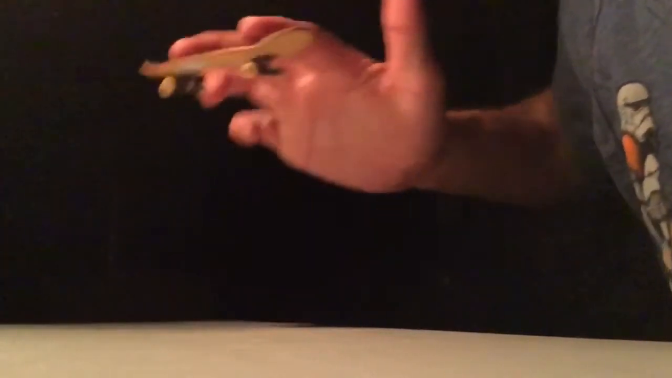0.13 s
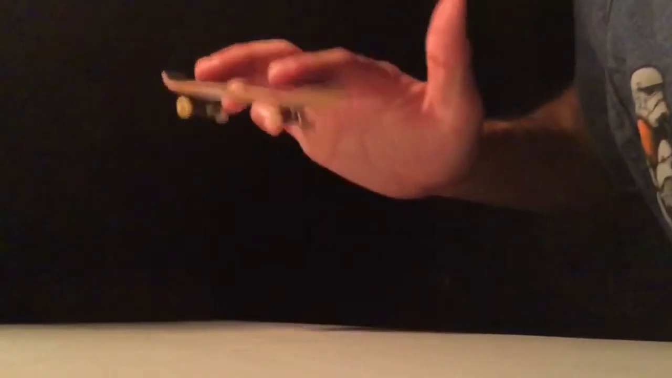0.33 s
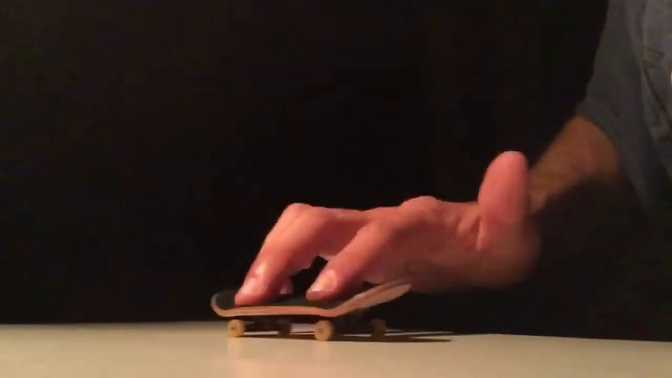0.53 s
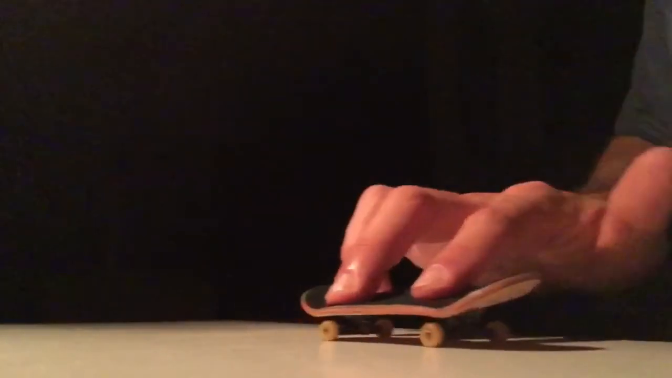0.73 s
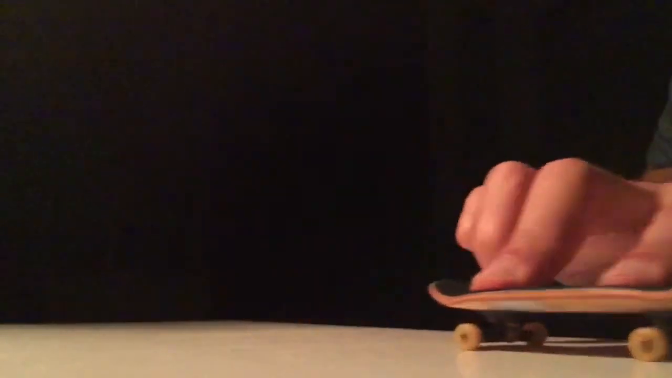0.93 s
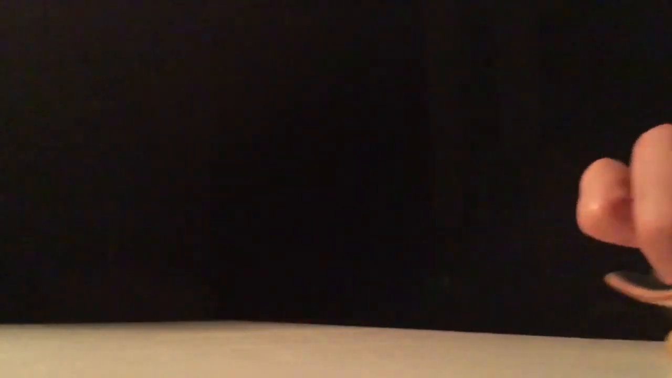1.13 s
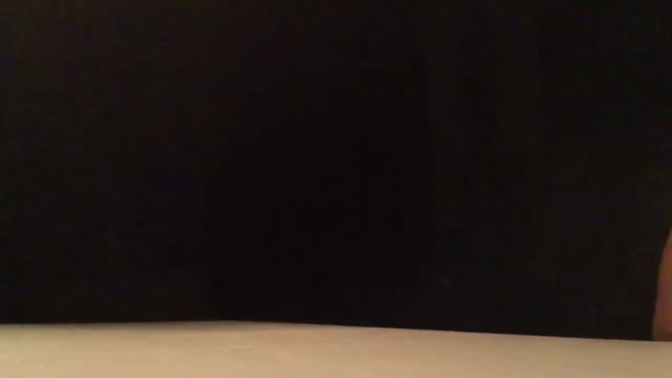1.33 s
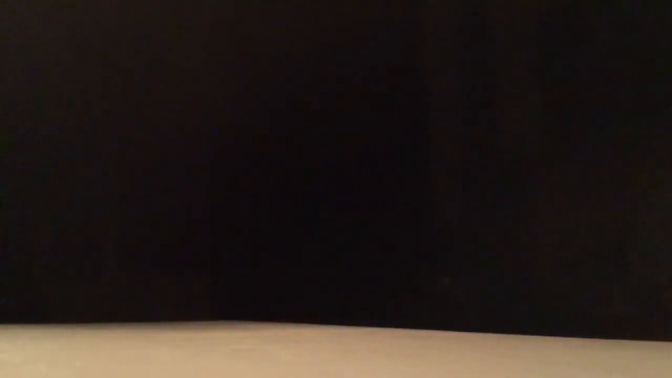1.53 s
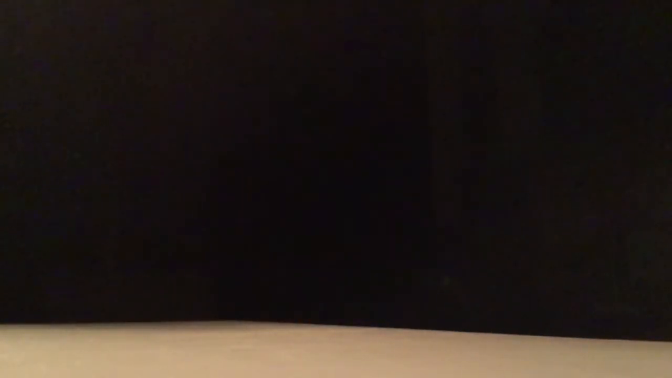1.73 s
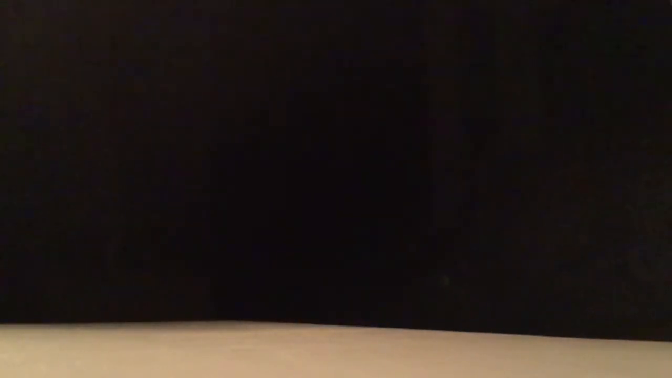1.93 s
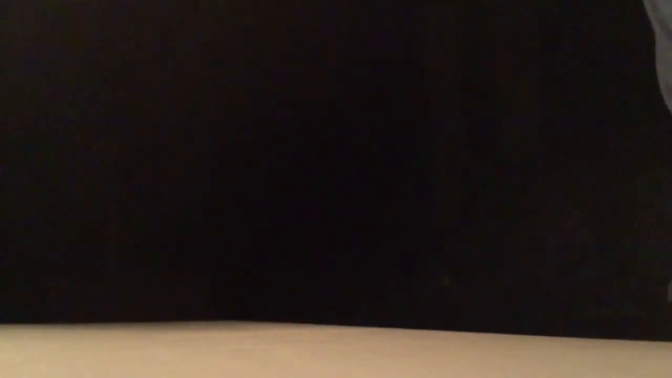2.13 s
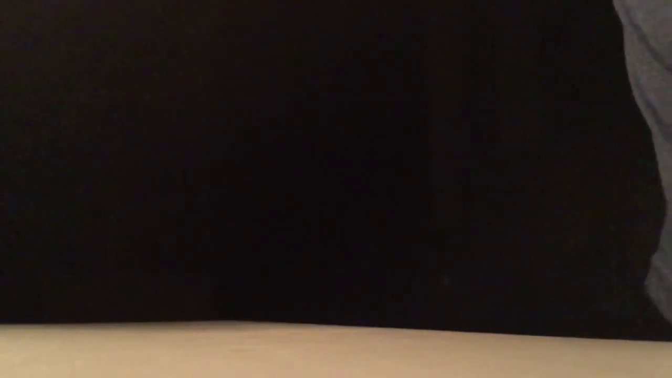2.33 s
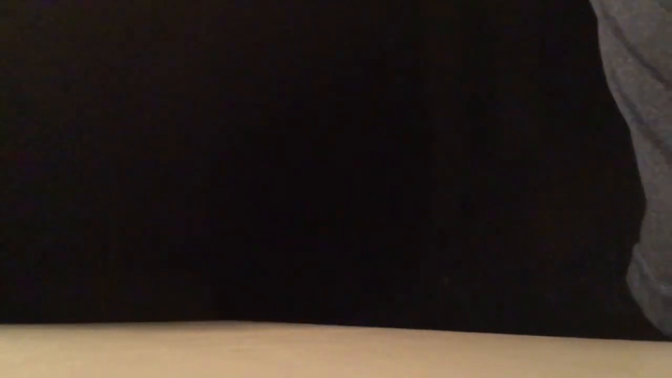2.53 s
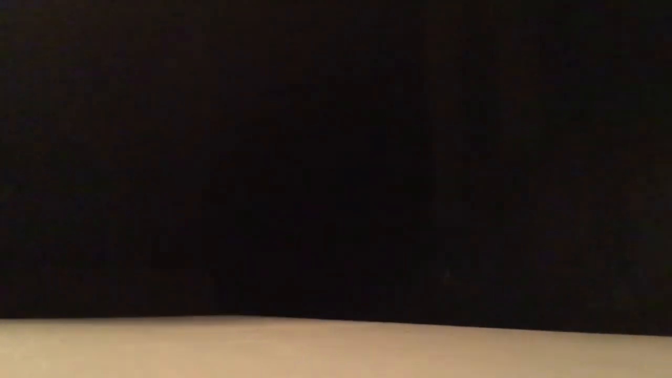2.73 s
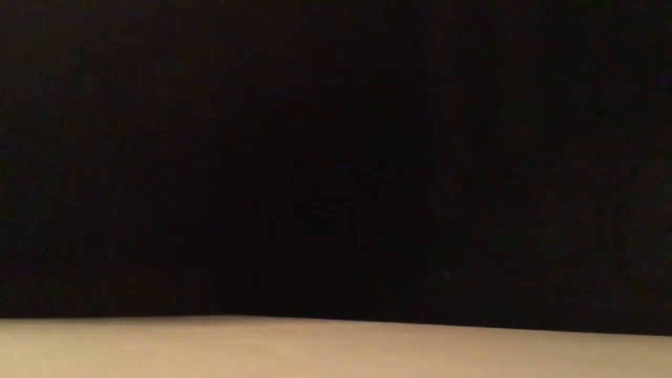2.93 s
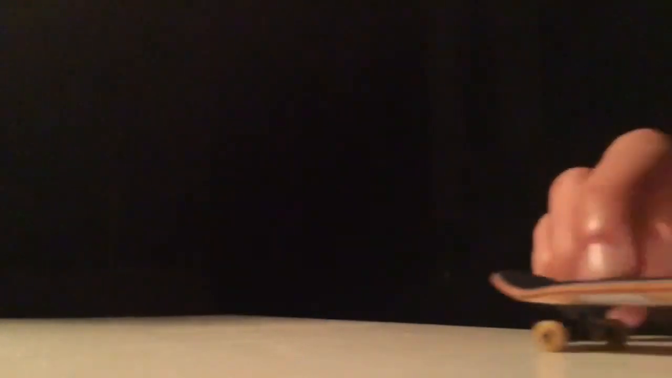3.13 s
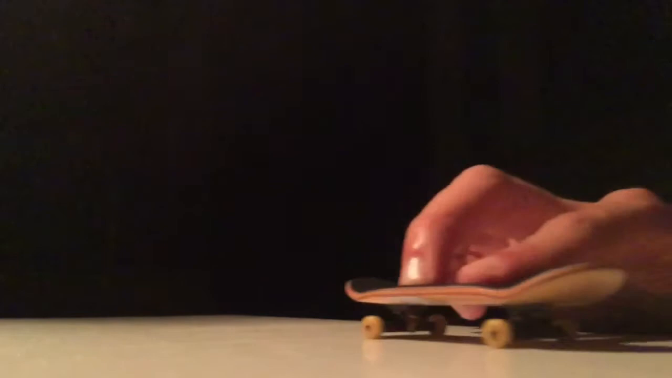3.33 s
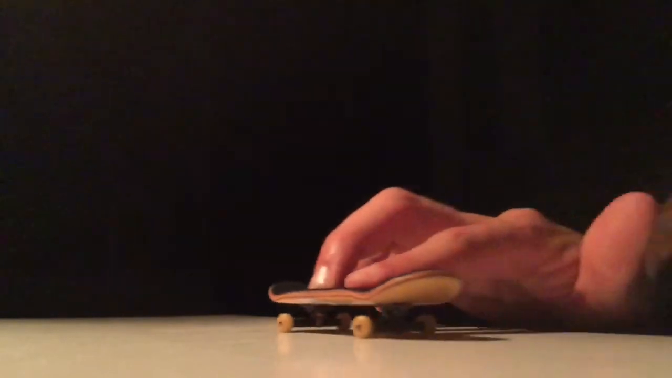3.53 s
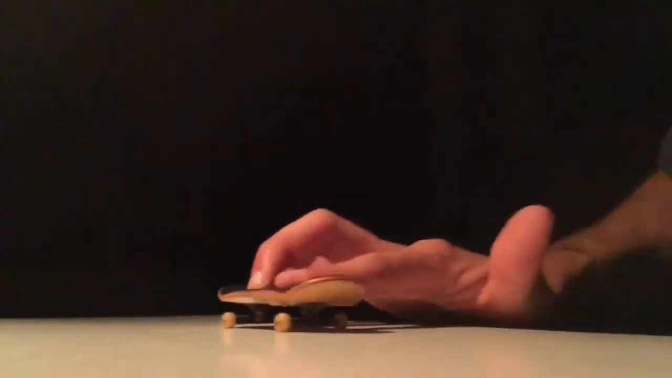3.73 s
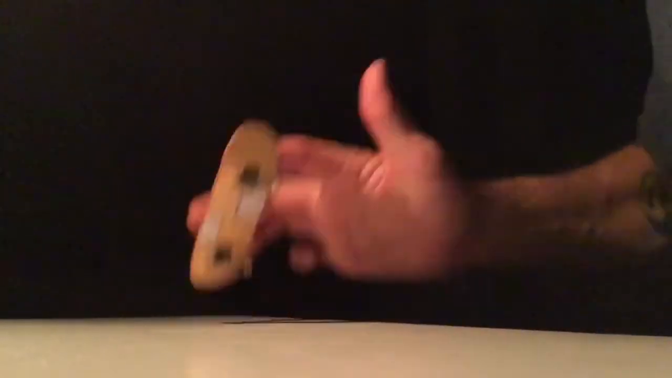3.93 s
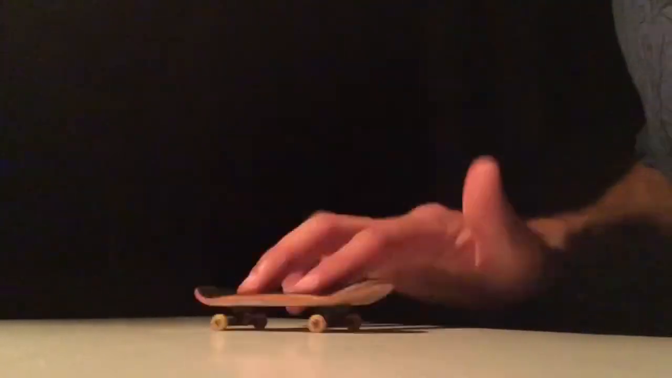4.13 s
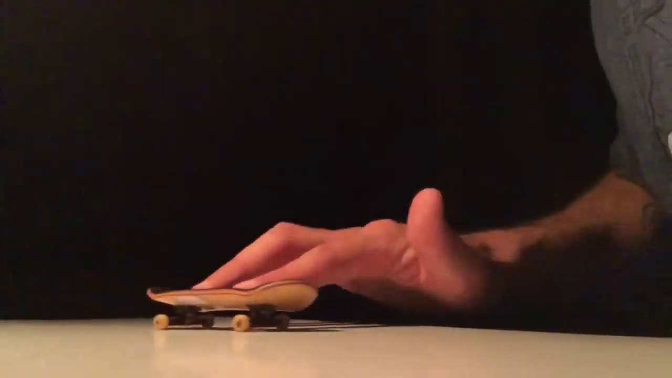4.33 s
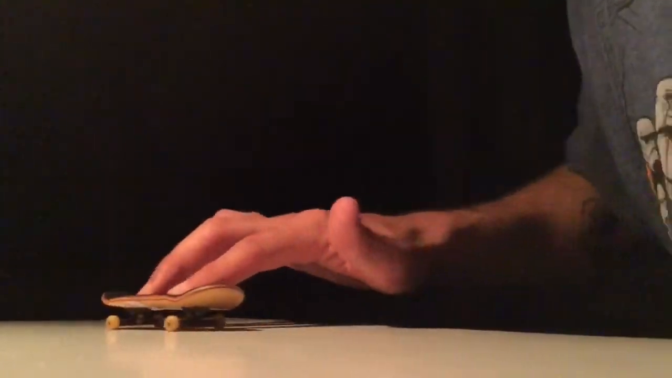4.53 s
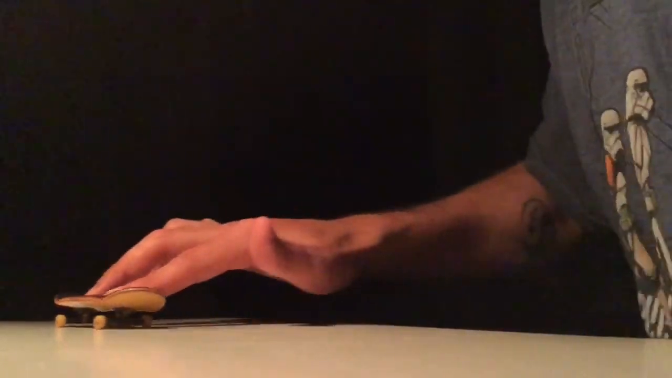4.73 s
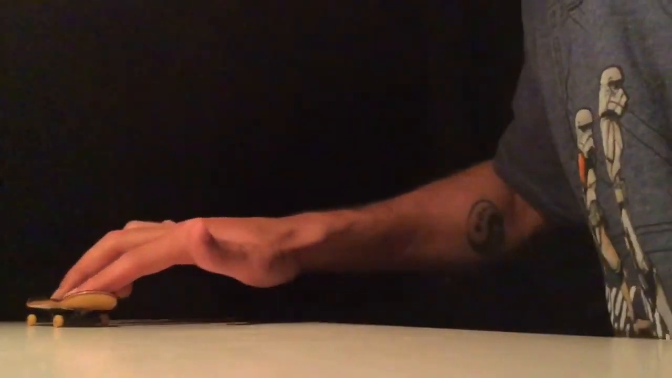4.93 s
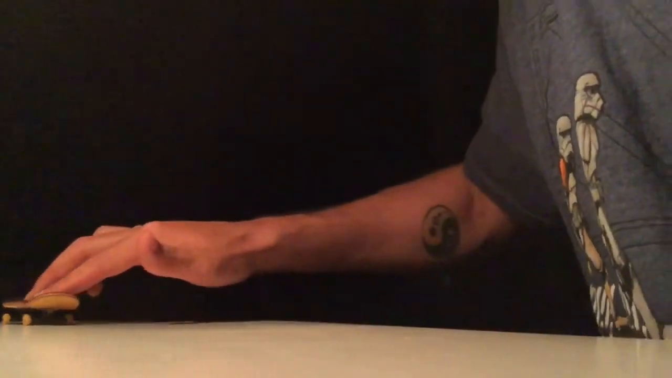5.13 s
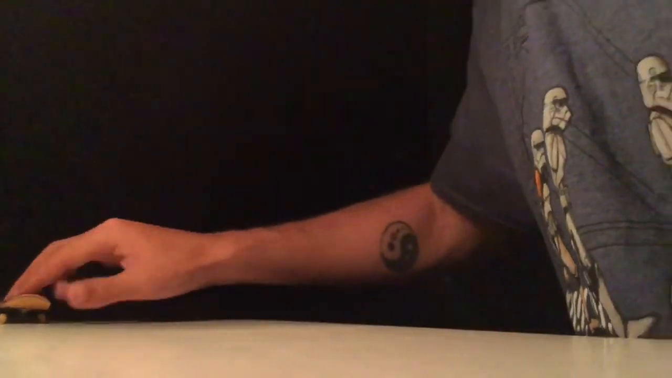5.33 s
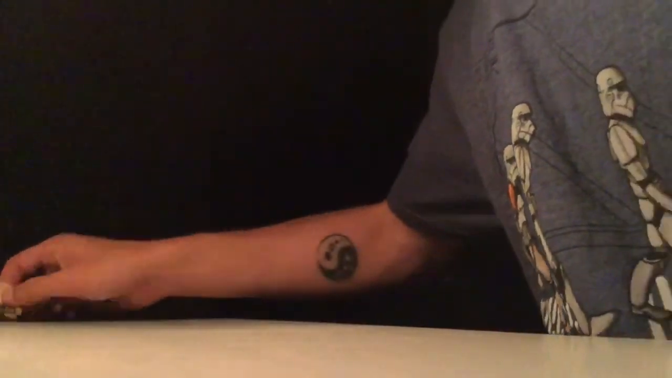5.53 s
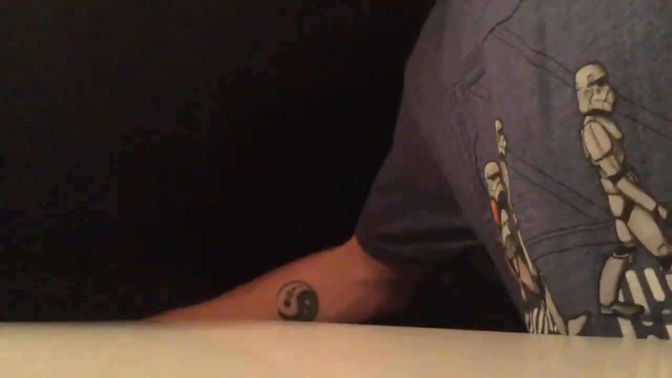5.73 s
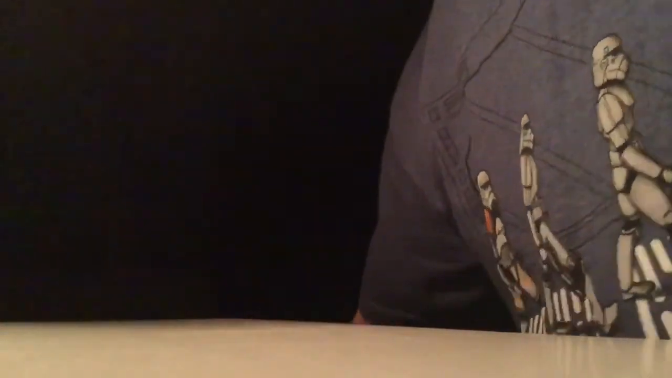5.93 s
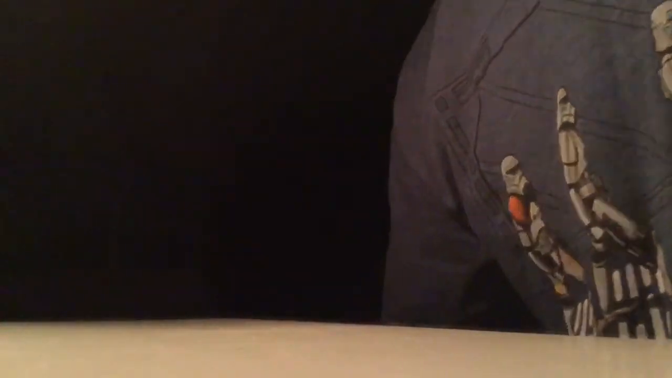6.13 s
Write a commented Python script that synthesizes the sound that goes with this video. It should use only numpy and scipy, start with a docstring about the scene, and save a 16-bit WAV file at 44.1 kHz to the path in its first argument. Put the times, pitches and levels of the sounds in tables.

```python
"""Fingerboard on a tabletop

A fingerboard is pushed to and fro in a small room, close to the microphone. Its hard wheels drum
on the grain of the top, which booms and rings. Fingers scuff the grip tape and the board scrapes
along an edge. After two hard shoves the tail pops, the wheels slam down in sharp clacks, and the
board rolls off to clatter at the far end of the table."""
import sys
import numpy as np
from scipy import signal
from scipy.fft import rfft, irfft, next_fast_len
from scipy.io import wavfile
from scipy.ndimage import uniform_filter1d, map_coordinates

SR = 44100
rng = np.random.default_rng(int(sys.argv[2]) if len(sys.argv) > 2 else 0)


def generate_wav(signal):
    """Clip the signal to [-1, 1] and save it as 16-bit WAV at the path in sys.argv[1]."""
    frames = np.transpose(np.atleast_2d(signal))
    scaled = np.clip(frames, -1, 1) * 32767
    pcm = np.round(scaled).astype(np.int16)
    wavfile.write(sys.argv[1], SR, pcm)


N = 277389


def amp(db):
    """Gain of a level in dB."""
    return np.exp(np.asarray(db) * (np.log(10) / 20))


def unit(x):
    """x at rms 1."""
    return x / np.sqrt(np.mean(x ** 2) + 1e-20)


def clock():
    """The time of every sample in seconds."""
    return np.arange(N) / SR


def along(points, hz):
    """Read a curve of (Hz, value) points on a log frequency axis."""
    freqs, values = np.transpose(points)
    return np.interp(np.log(hz + 1), np.log(freqs + 1), values)


def curves(rows):
    """Automation: one value per sample for each column after the time."""
    times, *columns = np.transpose(rows)
    return [np.interp(clock(), times, column) for column in columns]


def during(start, stop, fade):
    """A gate from start to stop, with equal-power fades at both ends."""
    return np.sqrt(np.clip(.5 + np.minimum(clock() - start, stop - clock()) / fade, 0, 1))


def wobble(rate, t):
    """A smooth random curve at the times t, with rate knots a second."""
    knots = rng.standard_normal(int(t[-1] * rate) + 4)
    fine = np.arange(0, len(knots) - 1, .125)
    return np.interp(t * rate, fine, map_coordinates(knots, [fine]))


def bell(x, centre, width):
    """A resonance-shaped bump: 1 at the centre, a half at half a width to either side."""
    return 1 / (1 + (2 * (x - centre) / width) ** 2)


def filtered(x, response):
    """x through a gain that depends on frequency."""
    size = next_fast_len(len(x) + 8192)
    return irfft(rfft(x, size) * response(np.fft.rfftfreq(size, 1 / SR)), size)[..., :len(x)]


def coloured(x, spectrum, peaks=()):
    """x at rms 1 after an EQ curve (Hz, dB) and resonant peaks (Hz, width in Hz, lift in dB)."""
    lift_db = lambda f: sum(db * bell(f, hz, width) for hz, width, db in peaks)
    return unit(filtered(x, lambda f: amp(along(spectrum, f) + lift_db(f))))


def noise(spectrum, peaks=(), size=N):
    """Coloured noise at rms 1."""
    return coloured(rng.standard_normal(size), spectrum, peaks)


def add(track, start, sound):
    """Mix a sound into the track at start seconds."""
    part = track[round(start * SR):][:len(sound)]
    part += sound[:len(part)]


# Colours of the ambience; the hiss also feeds the wheel whirr. Each row: frequency in Hz, level in dB.
RUMBLE_EQ = [(15, -41), (25, -25), (75, -4.5), (94, -3), (124, -11), (900, -29), (1170, -65), (1980, -120)]
HISS_EQ = [(410, -47), (700, -13), (752, -11), (1680, -14), (2740, -15), (6260, -28.5), (8000, -44),
           (10400, -74), (17600, -120)]
ROOM_TONE_EQ = [(24, -51), (40, -34.5), (120, 0.5), (228, 1), (343, 3), (435, -8), (685, -5.5), (1000, -11),
                (1160, -19), (1340, -15), (1700, -27), (1930, -27.5), (2250, -40.5), (3200, -39.5),
                (12000, -40), (15600, -81), (22000, -120)]

def background(wash_t60=0.42, tone_db=-64):
    """A wash of rumble and hiss dies to a faint rumble; dull room tone enters with the first run."""
    t = clock()
    wash = amp(-60 * t / wash_t60)
    rumble = (amp(-75) + amp(-59) * wash) * noise(RUMBLE_EQ)
    hiss = amp(-56.5) * wash * noise(HISS_EQ)
    tone_level = amp(tone_db + 1.1 * wobble(20, t))
    tone = tone_level * noise(ROOM_TONE_EQ, peaks=[(138, 28, 11), (236, 46, 12), (1430, 1200, 20)])
    first_run = STUTTER_BURSTS[0][0]
    return (rumble + hiss) * during(0, 0.554, 0.0069) + tone * during(first_run, N / SR, 0.0029)


# Random swirl in the tone, deepest in the treble. Each row: frequency in Hz, depth in dB.
SWIRL_DEPTH = [(800, .5), (2000, 2.4), (5000, 2.8), (8000, 4.5)]

def resonate(drive, spectrum, peaks=(), sliding=(), glide=((0, 1),), drift=0.011, swell=0.13):
    """Resonances swell and drift as the wheels cross their nodes; glide bends the sliding ones."""
    f, t, frames = signal.stft(drive, SR, nperseg=2048)
    gain_db = along(spectrum, f)[:, None]
    for group, bend in ((peaks, 1), (sliding, np.interp(t, *np.transpose(glide)))):
        for hz, width, db in group:
            centre = hz * bend * (1 + drift * max(1, hz / 900) * wobble(5, t))  # highs drift most
            lift_db = db * (1 + swell * wobble(7, t))
            gain_db = gain_db + lift_db * bell(f[:, None], centre, width)
    patches = uniform_filter1d(rng.standard_normal(frames.shape), size=12, axis=0)
    patches = unit(uniform_filter1d(patches, size=4, axis=1))
    gain_db = gain_db + along(SWIRL_DEPTH, f)[:, None] * patches
    return signal.istft(frames * amp(gain_db), SR, nperseg=2048)[1][:N]


def free_wheels(level_db=-76.5, stop=0.308):
    """In the air the wheels whirr on their axles, sinking in pitch until a finger stops them."""
    whirr = resonate(rng.standard_normal(N), HISS_EQ, sliding=[(2700, 630, 15)],
                     glide=[(0, 1.08), (stop, 0.95)], drift=0.003, swell=0.17)
    return unit(whirr) * amp(level_db) * during(0, stop, 0.052)


# Colours of the stutter, and of its bright tail and the clacks' crack.
# Each row: frequency in Hz, level in dB.
STUTTER_EQ = [(18, -44), (30, -19), (284, 7.5), (561, -5), (622, -17), (1020, -5), (1470, -8),
              (2830, -10.5), (15500, -26)]
CRACK_EQ = [(150, -20.5), (400, -4.5), (1200, -4.5), (3200, -1.5), (6000, -3), (8500, -6.5), (10500, -8.5),
            (13500, -7.5), (16000, -19)]
# The chops of the stutter. Each row: start in seconds, stop in seconds, level in dB.
STUTTER_BURSTS = [(0.5927, 0.5967, -33), (0.604, 0.61, -33), (0.6154, 0.626, -37.5), (0.6276, 0.64, -39)]

def stutter(tail_db=-46, tail_t60=0.15):
    """The first run starts with a rough, chopped burst of noise and a short tail."""
    chops = sum(amp(db) * during(start, stop, 0.0013) for start, stop, db in STUTTER_BURSTS)
    after = clock() - STUTTER_BURSTS[-1][1]
    tail = (after > 0) * amp(tail_db - 60 * np.abs(after) / tail_t60)
    return chops * noise(STUTTER_EQ) + tail * noise(CRACK_EQ)


def grit(per_s, spread_db=3, flutter_db=1.32, clumps_per_s=100):
    """Tiny blows from the grain of a surface, random in size and swelling in clumps."""
    hits = np.flatnonzero(rng.random(N) < per_s / SR)
    size_db = spread_db * rng.standard_normal(N)[hits]
    step = SR // 1000
    clump_db = flutter_db * wobble(clumps_per_s, clock()[::step])[hits // step]
    blows = np.zeros(N)
    blows[hits] = rng.choice([-1, 1], N)[hits] * amp(size_db + clump_db)
    return blows


def rolling(spectrum, peaks, sliding=(), glide=((0, 1),), grains_per_s=5000):
    """Grit and a few larger specks shake the table, in four bands: boom, body, rasp and fizz."""
    blows = grit(grains_per_s) + amp(4) * grit(per_s=18)
    top = resonate(blows, spectrum, peaks, sliding, glide)
    crossovers_hz = np.array([[450], [1800], [3400], [6500]])
    lowpassed = filtered(top, lambda f: 1 / (1 + (f / crossovers_hz) ** 12))
    boom, body, rasp, fizz, air = np.diff([np.zeros(N), *lowpassed, top], axis=0)
    fizz = fizz + air * amp(-5 + 5 * wobble(24, clock()))  # the highest hiss comes in patches
    return np.array([unit(band) * amp(0.44 * wobble(16, clock())) for band in (boom, body, rasp, fizz)])


def pushed(strokes, responses, bands, brake_curve):
    """The hand speeds up, holds and brakes; each band of the roll follows its effort and brightness."""
    t, out = clock(), np.zeros(N)
    for start, stop, speed_up, slow_down, db, rise_db, fall_db, bright_db, bright_db_per_s in strokes:
        rising = np.clip((t - start) / speed_up, 0, 1)
        braking = np.clip(1 - (stop - t) / slow_down, 0, 1)
        effort_db = -rise_db * np.cos(np.pi / 2 * rising) ** 2 - fall_db * braking ** brake_curve
        tilt_db = bright_db + bright_db_per_s * (np.clip(t, start, stop) - (start + stop) / 2)
        mix = sum(band * amp(band_db + by_effort * effort_db + by_tilt * tilt_db)
                  for band, (band_db, by_effort, by_tilt) in zip(bands, responses))
        out += amp(db) * during(start, stop, 0.025) * mix
    return out


# Colour of the roll near the microphone. Each row: frequency in Hz, level in dB.
NEAR_EQ = [(41, -89), (70, -126), (123, -12.5), (168, -21), (230, 6), (369, -5), (553, -13), (605, -19.5),
           (692, -2.5), (866, -12), (1270, -10), (1820, -16.5), (4170, -23.5), (7650, -42), (9500, -46.5),
           (15000, -53)]
# Resonances of the table going out and coming back, and the roll's upper resonances.
# Each row: centre in Hz, width in Hz, lift in dB.
OUTWARD_PEAKS = [(137.4, 42, 4.5), (230, 31, 7.4), (313, 44, 3.2), (415, 23, 7.8), (547.4, 25, 12.8),
                 (670, 21, 10), (967, 60, 14), (1070, 58, 4.5), (1283, 93, 8)]
HOMEWARD_PEAKS = [(138, 51, 7.3), (222.6, 42, 9.2), (423, 56, 8.1), (559, 36, 12.9), (698, 220, 7.6),
                  (952, 110, 11), (1276, 98, 9.6)]
UPPER_PEAKS = [(1590, 160, 2), (1950, 250, -3), (2620, 560, 8.5), (3050, 300, 3), (4400, 1200, 8.5),
               (5800, 500, -2), (7100, 1300, 8)]
# The roll's upper resonances slide in pitch as the board travels across the table.
# Each row: time in seconds, pitch factor.
UPPER_GLIDE = [(.85, 1.03), (1.08, 1.05), (1.25, 1.02), (1.45, 1.046), (2.8, 1.02), (3.15, 0.93),
               (3.45, 1.01), (6.1, 0.96)]
# Pass-bys at the microphone. Each row: time in seconds, boost in dB, half length in seconds.
PASS_BYS = [(1.12, 2.5, 0.26), (3.28, 5.5, 0.13)]
# How much of that boost each band takes: one factor each for boom, body, rasp and fizz.
PASS_BY_SHARES = [0.89, 0.84, 1.04, 1.06]
# Gentle strokes of the hand. Each row: start, stop, speed-up time and slow-down time in seconds,
# top level, effort rise, effort fall and brightness in dB, brightening in dB per second.
EASY_PUSHES = [(.645, 1.615, 0.23, 0.27, -41.5, 8.9, 6, -1.3, 9),
               (2.67, 3.69, 0.33, 0.22, -42, 17.5, 13.4, 2, -2),
               (6.01, 6.3, 0.32, .02, -38.5, 20.8, 2.2, 1.7, 13)]
# How boom, body, rasp and fizz follow the hand.
# Each row: level at top speed in dB, dB per dB of effort, dB per dB of brightness.
PUSH_RESPONSE = [(-1.5, 0.65, -.5), (-1, 1, 0), (-17.5, 1, 1.34), (-18.5, 1.05, 0.24)]

def easy_pushes():
    """The board rolls to and fro, swelling past the microphone; the table rings differently each way."""
    back = during(EASY_PUSHES[1][0], N / SR, 0.012)
    outward = rolling(NEAR_EQ, OUTWARD_PEAKS, UPPER_PEAKS, UPPER_GLIDE)
    homeward = rolling(NEAR_EQ, HOMEWARD_PEAKS, UPPER_PEAKS, UPPER_GLIDE)
    closeness_db = sum(db * bell(clock(), when, 2 * half) for when, db, half in PASS_BYS)
    bands = ((1 - back) * outward + back * homeward) * amp(np.outer(PASS_BY_SHARES, closeness_db))
    return pushed(EASY_PUSHES, PUSH_RESPONSE, bands, brake_curve=3.8)


# The sandy colour of a scuff. Each row: frequency in Hz, level in dB.
SCUFF_EQ = [(500, -20.5), (1500, 8), (3000, -4.5), (6000, 4.5), (10000, 0), (14000, -2.5), (16000, 4.5)]
# Scuff cues. Each row: peak time in seconds, level in dB, seconds per 10 dB of rise, t60 in seconds.
SCUFF_CUES = [(.93, -59, 0.027, 0.2), (1.42, -63, .04, 0.24), (1.626, -49.5, .005, 0.16),
              (3.025, -57, 0.015, 0.21), (3.425, -69, .008, 0.049), (3.26, -54, 0.078, 0.25),
              (3.35, -57, .01, 0.058), (3.712, -61.5, .0053, 0.16), (3.79, -52, 0.0088, 0.072),
              (3.842, -41, 0.01, 0.069), (3.945, -40, .015, 0.18), (3.996, -39, .003, 0.12),
              (5.393, -45, 0.004, 0.16), (5.11, -62, .02, 0.3), (5.831, -46, .002, 0.082),
              (6.199, -51.5, .0031, 0.1)]

def scuffs():
    """Fingers on the grip tape and scuffing trucks make gritty hisses that swell and die."""
    t = clock()
    level = sum(amp(db - np.maximum(10 * (peak - t) / rise, 60 * (t - peak) / t60))
                for peak, db, rise, t60 in SCUFF_CUES)
    return level * coloured(grit(per_s=10000, spread_db=7, flutter_db=-5), SCUFF_EQ)


# Small bumps of wheels and trucks. Each row: start in seconds, level in dB, pitch in Hz.
TICK_CUES = [(1.177, -23.5, 1150), (1.177, -48, 4350), (1.464, -29.5, 990), (1.627, -30.5, 2400),
             (2.884, -40, 773), (2.912, -35, 1490), (3.161, -25.5, 762), (3.259, -29.5, 3460),
             (3.393, -24.5, 695), (3.786, -32.5, 3020), (3.837, -22, 1050), (3.899, -43.5, 8900),
             (3.913, -30, 3200), (3.946, -36, 2560), (4.434, -25, 1040), (4.433, -43, 4970),
             (4.485, -59, 4860), (4.492, -49, 1000), (4.53, -29.5, 980), (4.528, -46.5, 2550),
             (4.600, -31, 990), (4.672, -23, 950), (4.686, -26, 950), (4.705, -27, 940), (4.951, -43, 3930),
             (5.262, -57, 10500)]

def ticks(t60=0.014):
    """Specks under a wheel and play in the trucks give short ticks: dull and broad, or bright and narrow."""
    out, t = np.zeros(N), np.arange(SR // 16) / SR
    for start, db, hz in TICK_CUES:
        q = 2 * max(1, hz / 3200)
        bandpass = lambda f: 1 / (1 + np.abs(q * (f / hz - hz / (f + 1))) ** 4)
        burst = unit(filtered(rng.standard_normal(len(t)), bandpass))
        add(out, start, amp(db - 60 * t / t60) * np.minimum(t * hz, 1) * burst)
    return out


# Colour of the edge scrape. Each row: frequency in Hz, level in dB.
GRIND_EQ = [(59, -44), (100, -24.5), (223, -25.5), (712, -23.5), (791, -23), (880, -9.5), (1100, -12.5),
            (1690, -7), (1880, -13.5), (3850, -22), (5400, -30), (7500, -46), (15500, -48.5)]
# Its resonances. Each row: centre in Hz, width in Hz, lift in dB.
GRIND_PEAKS = [(240, 60, 9.5), (550, 80, 6), (1230, 130, 5), (1633, 300, 5.3), (2040, 300, 4.03),
               (3155, 450, 6), (3710, 400, 6), (4350, 400, 5)]

def grind(start=1.612, stop=1.759, scrape_db=-41.5, whistle_from=1.655, whistle_db=-46.5):
    """The board scrapes along an edge and its deck whistles, both sinking in pitch as it slows."""
    glide = [(start, 1.17), (stop, 0.97)]
    blows = grit(per_s=4000, spread_db=-0.5, flutter_db=1)
    scrape = unit(resonate(blows, GRIND_EQ, sliding=GRIND_PEAKS, glide=glide, drift=0.0033, swell=0.18))
    bend = curves(glide)[0] ** 0.55  # the whistle follows about half of the fall
    hz = 1640 * bend * (1 + 0.033 * wobble(200, clock()))
    flutter = amp(4 * wobble(60, clock()))
    whistle = unit(np.sin(2 * np.pi * np.cumsum(hz) / SR) * flutter)
    return (scrape * amp(scrape_db) * during(start, stop, 0.031)
            + whistle * amp(whistle_db) * during(whistle_from, stop, 0.012))


def ring(modes, t, attack):
    """Damped modes build up during contact, new in balance each blow; the rattle blurs their pitch."""
    sound = np.zeros(len(t))
    for hz, db, t60 in modes:
        decay = amp(db + rng.normal(0, 1.3) - 60 * np.maximum(t - attack, 0) / t60)
        blur_hz = 11 * min(hz / 500, 2) * wobble(150, t)
        cycles = np.cumsum(hz + blur_hz) / SR + rng.random()
        sound += decay * np.sin(2 * np.pi * cycles)
    return sound * np.minimum(t / attack, 1) / np.linalg.norm([amp(db) for _, db, _ in modes])


# What rings in a clack. Each row: pitch in Hz, relative level in dB, t60 in seconds.
DECK_MODES = [(1720, 2.5, 0.023), (2040, -1.5, 0.024), (3210, 1, 0.02), (4060, -3, 0.018), (4750, -4, 0.02)]
WHEEL_MODES = [(64.9, -9, 0.015), (799, -0.5, 0.05), (945, -12, 0.066), (1123, -5.5, 0.04),
               (1237, 2.5, 0.046), (1275, -8.5, 0.028)]
TRUCK_MODES = [(5290, 1, 0.015), (5950, -2, .012), (8600, -6.5, 0.013)]
TABLE_MIDDLE_MODES = [(133, -20, 0.14), (235, 0.5, 0.087), (242, -6.5, 0.073), (320, -0.5, 0.12),
                      (384, 6, 0.031), (520, -11, 0.069), (643, -21, 0.2)]
TABLE_END_MODES = [(227, -7, 0.15), (550, 1, 0.06), (686, -5, 0.05), (853, -0.5, 0.054),
                   (1093, -0.5, 0.023), (1280, -4.5, 0.048), (1500, -6.5, 0.055), (1806, -5.5, .05),
                   (2065, -4.5, 0.05), (5060, -21, .1), (5380, -19, .1)]
# The woody knock, a close pair of notes pitched by where the deck is struck.
# Each row: pitch factor, relative level in dB.
KNOCK_PAIR = [(0.99, -2), (.885, -5.5)]
# Colour of what nearby things throw back. Each row: frequency in Hz, level in dB.
SCATTER_EQ = [(80, -25), (220, 4), (550, 2.5), (1000, -7), (2000, -3), (3500, -5), (5500, -11), (9000, -15),
              (15000, -22.5)]
# Pops and landings. Each row: start in seconds, crack level in dB, crack pitch in Hz, levels in dB of
# table middle, table end, wheels, deck and knock, knock pitch in Hz, trucks in dB, contact in seconds.
CLACK_CUES = [(1.7816, -26, 3400, -30.5, -32, -42.5, -16, -38.5, 1650, -39, 0.0013),
              (3.9927, -11.5, 4200, -17, -36.5, -27.5, -18, -20.5, 2090, -7, 0.00088),
              (4.2048, -10.5, 3000, -11, -28.5, -9, -15, -18.5, 2910, -19.5, .0045),
              (4.2111, -12.5, 5600, -6, -24, -6.5, -18.5, -22.5, 2870, -22, .003),
              (4.229, -29, 4000, -22, -34.5, -23, -34, -38, 2854, -38, .003),
              (5.4804, -28.5, 7640, -32, -17.5, -24, -26, -12, 2075, -39.5, 0.0031),
              (5.522, -14.5, 5800, -25.5, -12.5, -30.5, -23, -4.5, 2130, -11.5, .0017),
              (5.5263, -20, 5550, -33, -22.5, -26, -21, -13, 2120, -21.5, .0013),
              (5.5365, -43, 2000, -27, -22, -39, -35, -24, 2100, -39.5, .003),
              (5.604, -35.5, 2640, -44, -42.5, -44, -29.5, -28, 2640, -61, .0028)]

def clacks(crack_t60=0.0098, knock_t60=0.022, scatter_t60=0.13, usual_contact_s=0.0021):
    """A chattering contact cracks, rings board and table, and scatters off the things nearby."""
    out, t = np.zeros(N), np.arange(SR // 4) / SR
    for (start, crack_db, crack_hz, middle_db, end_db, wheel_db, deck_db,
         knock_db, knock_hz, truck_db, contact) in CLACK_CUES:
        chatter = np.minimum(t / (0.3 * contact), 1) * amp(-60 * np.maximum(t - contact, 0) / crack_t60)
        crack = chatter * noise(CRACK_EQ, peaks=[(crack_hz, 0.33 * crack_hz, 8)], size=len(t))
        knock_modes = [(knock_hz * factor, db, knock_t60) for factor, db in KNOCK_PAIR]
        board = (amp(deck_db) * ring(DECK_MODES, t, 0.41 * contact)
                 + amp(wheel_db) * ring(WHEEL_MODES, t, 0.97 * contact)
                 + amp(knock_db) * ring(knock_modes, t, 0.15 * contact)
                 + amp(truck_db) * ring(TRUCK_MODES, t, 0.95 * contact))
        table = (amp(middle_db) * ring(TABLE_MIDDLE_MODES, t, 0.82 * contact)
                 + amp(end_db) * ring(TABLE_END_MODES, t, 1.9 * contact))
        add(out, start, amp(crack_db) * crack + board + table)
        levels = amp([crack_db, middle_db, end_db, wheel_db, deck_db, knock_db, truck_db])
        strength = np.linalg.norm(levels) * np.sqrt(contact / usual_contact_s)
        tail = amp(-23.5 - 60 * t / scatter_t60) * np.minimum(t / 0.0033, 1)
        add(out, start + contact, strength * tail * noise(SCATTER_EQ, size=len(t)))
    low_cut = signal.butter(2, 140, "high", fs=SR, output="sos")  # so small a top radiates little bass
    return signal.sosfilt(low_cut, out)


# Colours of the first shove and of the tail-down drag. Each row: frequency in Hz, level in dB.
SHOVE_EQ = [(41, -70), (70, -50), (150, -10.5), (232, 5.5), (450, -4.5), (560, -2), (820, -1.5), (1100, -6),
            (1350, -9), (1900, -19), (2300, -14), (2950, -10.5), (3490, -24), (5000, -25), (10300, -46),
            (15500, -42)]
DRAG_EQ = [(41, -68.5), (70, -48.5), (220, -4), (390, 2), (520, -3.5), (800, -6), (1250, -2), (1600, -10),
           (2100, -5), (3100, -7), (3600, -17), (4900, -14), (6000, -22.5), (10000, -33), (15500, -37.5)]
# Their resonances. Each row: centre in Hz, width in Hz, lift in dB.
SHOVE_PEAKS = [(970, 110, 3), (1266, 130, 5)]
DRAG_PEAKS = [(975, 110, 10), (1266, 130, 2)]
# The run-up to the pop. Each row: start, stop, speed-up time and slow-down time in seconds,
# top level, effort rise, effort fall and brightness in dB, brightening in dB per second.
HARD_SHOVES = [(3.7, 3.868, 0.09, 0.023, -36, 18.5, 13.5, -0.5, -8),
               (3.868, 3.987, 0.088, 0.0361, -20, 25, 23.5, 2.5, 18)]
# How boom, body, rasp and fizz follow a shove.
# Each row: level at top speed in dB, dB per dB of effort, dB per dB of brightness.
SHOVE_RESPONSE = [(-3.5, 0.56, -3.5), (1, 0.97, -0.66), (-8.5, 1.08, -0.1), (-15.5, 1.3, 0.9)]

def hard_shoves():
    """Two hard shoves drive the wheels over the grain, the second with the tail pressed down."""
    pressed = during(HARD_SHOVES[1][0], N / SR, 0.018)
    shove = rolling(SHOVE_EQ, SHOVE_PEAKS, grains_per_s=3500)
    drag = rolling(DRAG_EQ, DRAG_PEAKS, grains_per_s=3200)
    return pushed(HARD_SHOVES, SHOVE_RESPONSE, (1 - pressed) * shove + pressed * drag, brake_curve=0.71)


# Colours of the table's middle and far part. Each row: frequency in Hz, level in dB.
MIDDLE_EQ = [(41, -76.5), (70, -66), (215, -3), (330, -1), (605, -11), (906, -7), (1210, -7), (1700, -16.5),
             (1860, -28), (2430, -26.5), (4880, -30.5), (6390, -46.5), (15000, -64)]
FAR_EQ = [(41, -93), (70, -60), (134, -32), (330, -9.5), (441, -11.5), (847, -2.5), (1740, -19.5),
          (2720, -14.5), (3640, -22.5), (5220, -20.5), (6680, -46), (10700, -40), (15000, -82.5)]
# Their resonances, and the boom they share. Each row: centre in Hz, width in Hz, lift in dB.
MIDDLE_PEAKS = [(243, 60, 1.6), (400, 29, 4.5), (544.6, 24, 13.4), (817, 22, 14.1), (965, 85, 10),
                (1240, 130, 7.8), (2340, 180, 3.2), (2850, 400, 3.4), (4900, 480, 9), (7560, 550, 11)]
FAR_PEAKS = [(528, 41, 13), (643, 110, 7.9), (860, 81, 6), (1090, 60, 6.6), (2200, 450, 5.5),
             (2930, 840, 4), (4630, 800, 5)]
BOOM_PEAKS = [(345, 154, 8.5)]
# The boom climbs towards the table's end. Each row: time in seconds, pitch factor.
BOOM_GLIDE = [(4.3, 0.76), (4.75, 1.01), (5.15, 1.05), (5.45, 1.05)]
# Fader moves of the long roll. Each row: time in seconds, body level in dB, treble level in dB.
AWAY_LEVELS = [(4.31, -55, -67), (4.42, -45.5, -62), (4.54, -47, -71), (4.63, -44.5, -57), (4.72, -39, -51),
               (4.89, -44, -59.5), (4.98, -46.5, -54.5), (5.29, -46, -54.5), (5.455, -36.5, -45.5)]

def roll_away(start=4.28, stop=5.474, thin_from=5.2, boom_loss_db_per_s=55.5, fizz_loss_db_per_s=41):
    """After the landing the board rolls from mid-table to the far end, where boom and fizz drain away."""
    body_db, treble_db = curves(AWAY_LEVELS)
    far = during(5.044, N / SR, fade=0.28)
    middle_roll = rolling(MIDDLE_EQ, MIDDLE_PEAKS, BOOM_PEAKS, BOOM_GLIDE)
    far_roll = rolling(FAR_EQ, FAR_PEAKS, BOOM_PEAKS, BOOM_GLIDE)
    boom, body, rasp, fizz = np.sqrt(1 - far ** 2) * middle_roll + far * far_roll
    thinning_s = np.maximum(clock() - thin_from, 0)
    low = amp(body_db) * (body + amp(2 - boom_loss_db_per_s * thinning_s) * boom)
    high = amp(treble_db) * (amp(-2) * rasp + amp(-5 - 3 * far - fizz_loss_db_per_s * thinning_s) * fizz)
    return during(start, stop, 0.0092) * (low + high)


# Reverb time of the small room. Each row: frequency in Hz, t60 in seconds.
ROOM_DECAY = [(150, .3), (500, 0.45), (2000, 0.33), (5000, 0.32), (14000, 0.24)]

def room(dry, wet_db=-31, predelay_s=0.0074):
    """The walls ring on faintly, each frequency dying at its own speed."""
    hz, t, frames = signal.stft(rng.standard_normal(SR // 2), SR, nperseg=256)
    decay = amp(-60 * t / along(ROOM_DECAY, hz)[:, None])
    tail = signal.istft(frames * decay, SR, nperseg=256)[1]
    out = dry.copy()
    add(out, predelay_s, signal.fftconvolve(dry, amp(wet_db) * tail / np.linalg.norm(tail)))
    return out


def scene():
    """The mono mix: hits and scrapes with a touch of room, the rolling dry, ambience underneath."""
    contacts = room(clacks() + ticks() + grind() + scuffs())
    rolls = easy_pushes() + hard_shoves() + roll_away()
    return (contacts + rolls + free_wheels() + stutter() + background())[None]


def record(dry, ceiling=0.95, top_hz=16000):
    """The loudest clacks softly overload the microphone; nothing passes above its band limit."""
    clipped = dry[0] / (1 + np.abs(dry[0] / ceiling) ** 6) ** (1 / 6)
    return filtered(clipped, lambda f: np.clip((top_hz - f) / 500 + .5, 0, 1))[None]


dry = scene()
out = record(dry)
generate_wav(out)
```